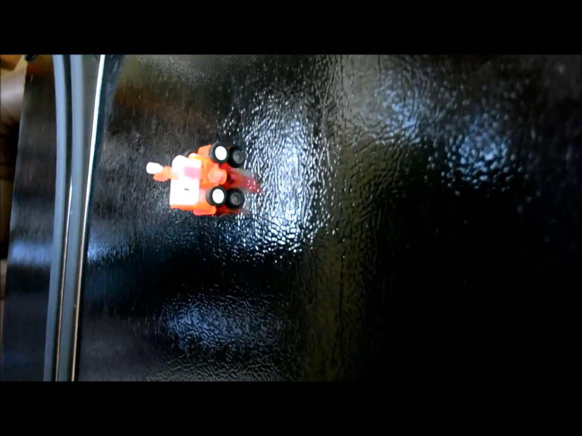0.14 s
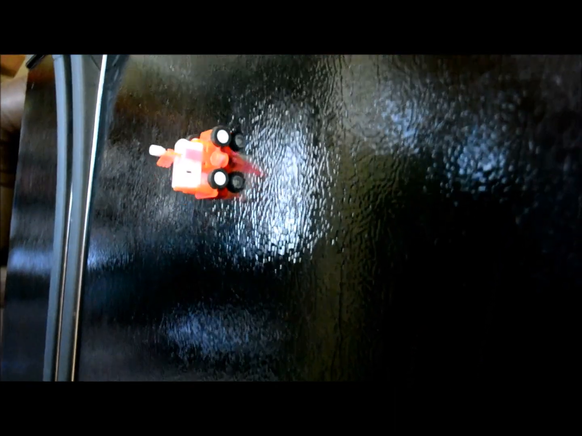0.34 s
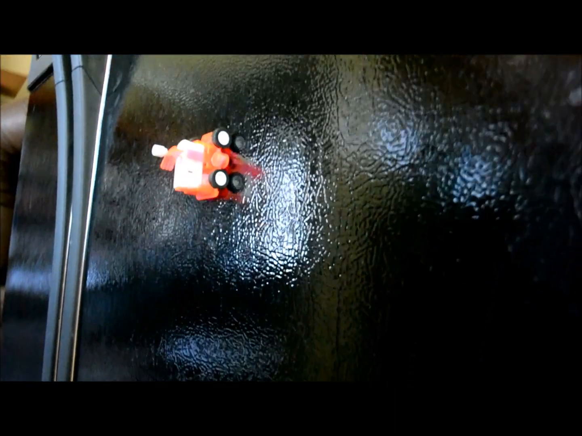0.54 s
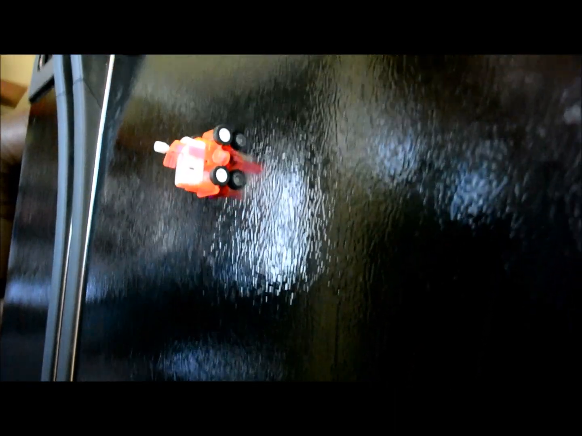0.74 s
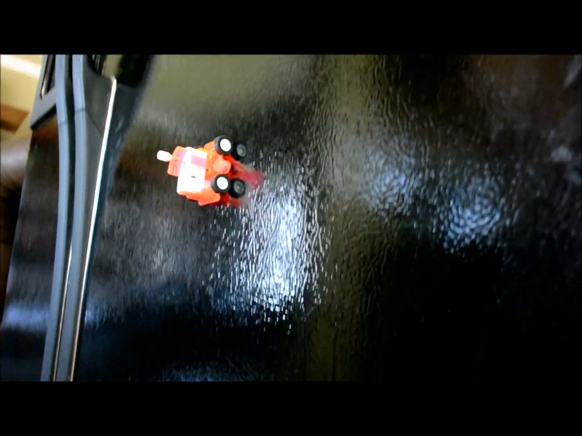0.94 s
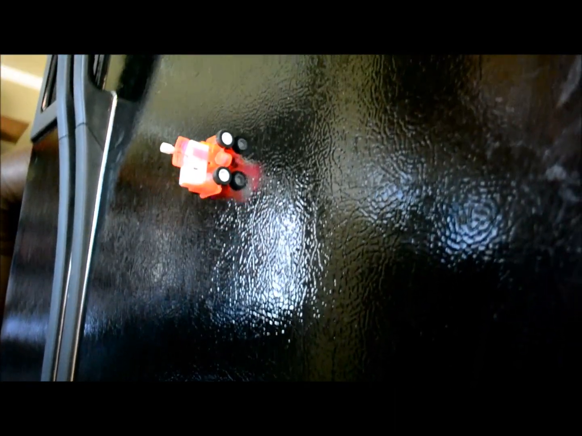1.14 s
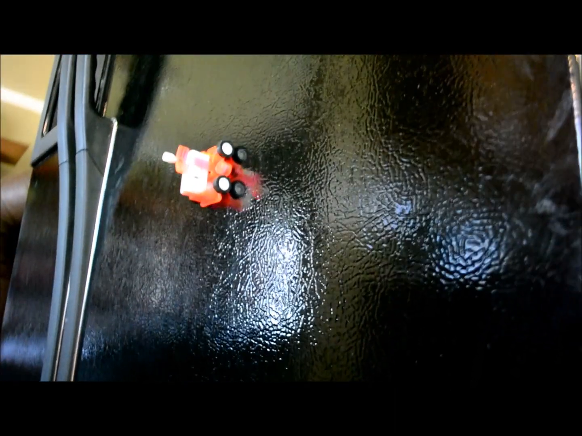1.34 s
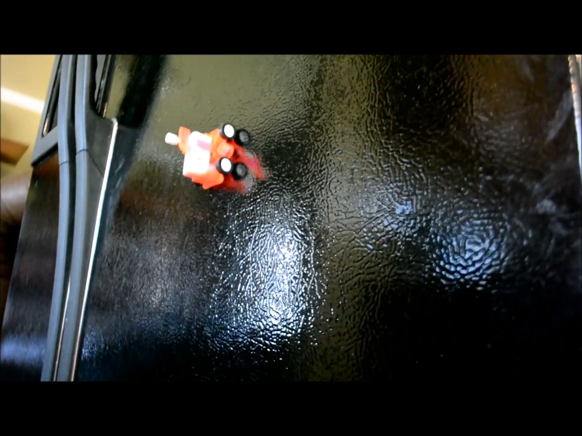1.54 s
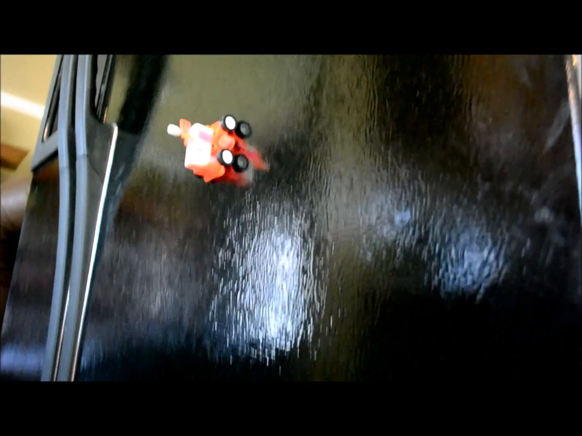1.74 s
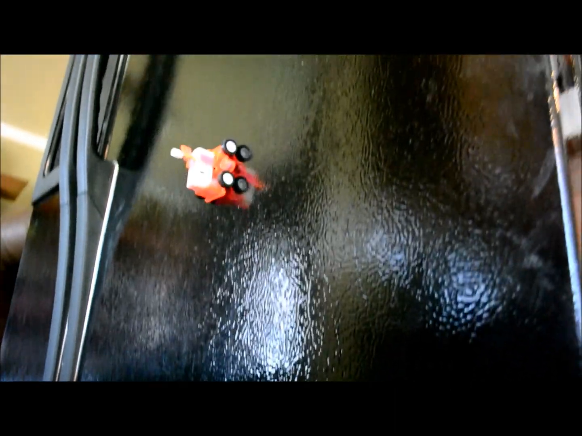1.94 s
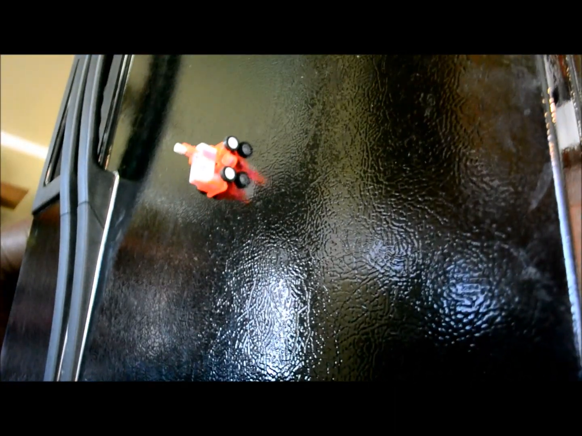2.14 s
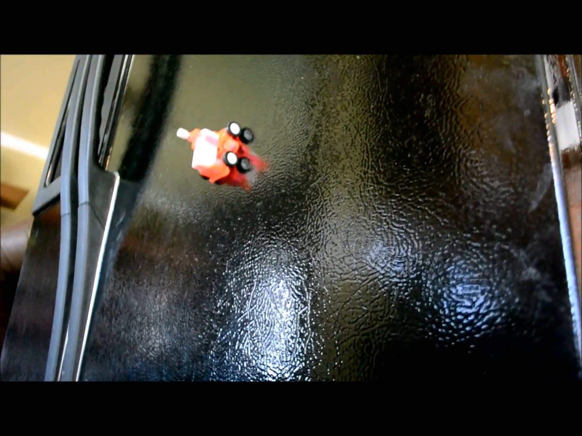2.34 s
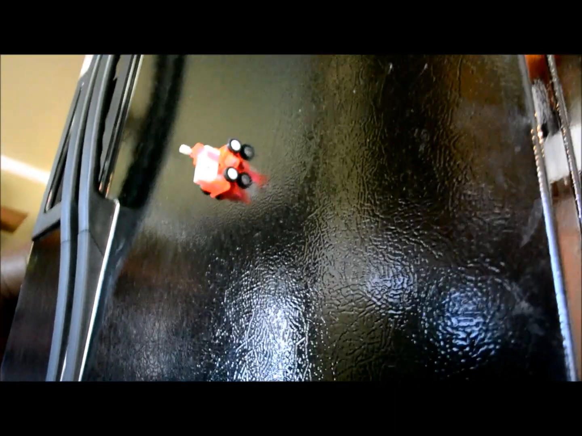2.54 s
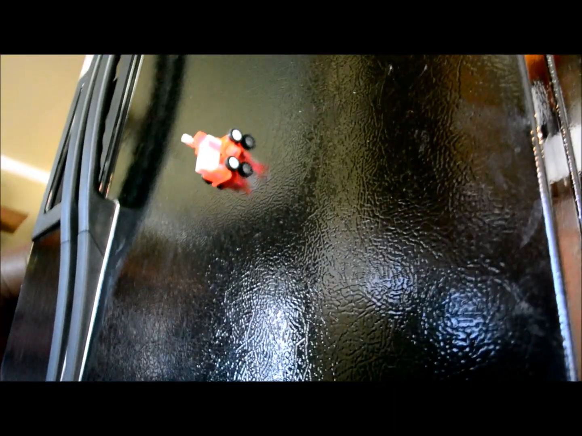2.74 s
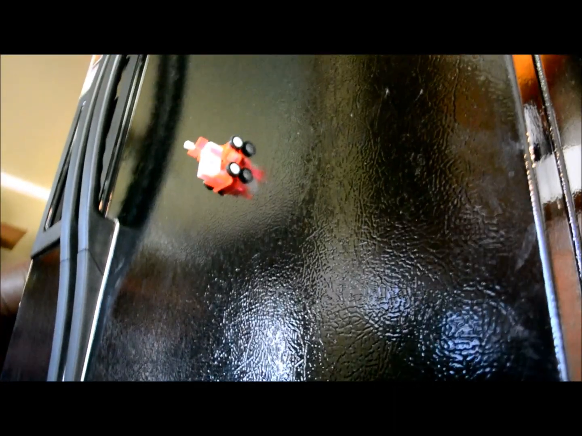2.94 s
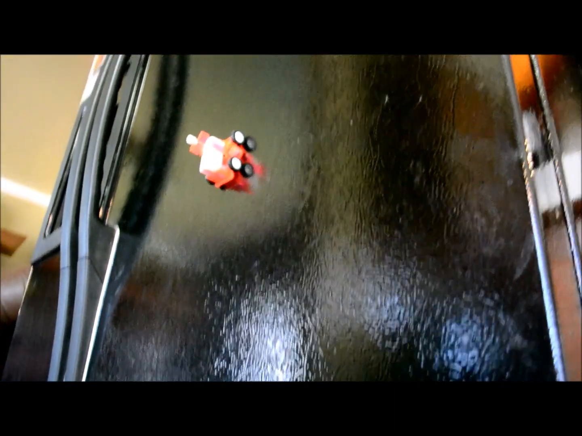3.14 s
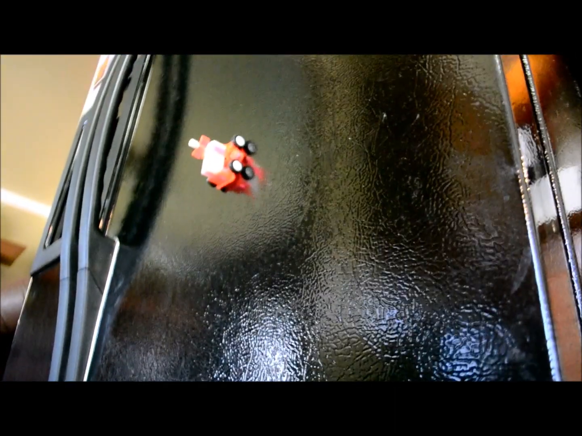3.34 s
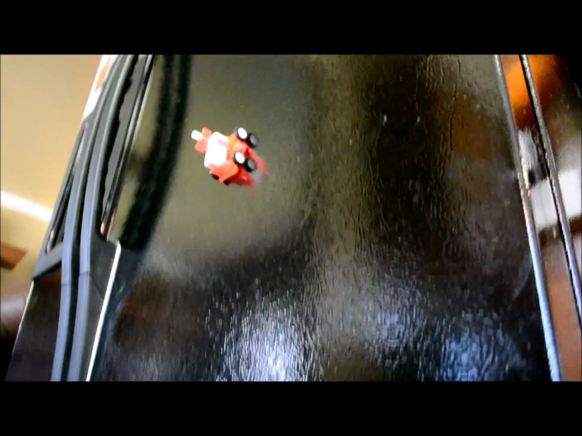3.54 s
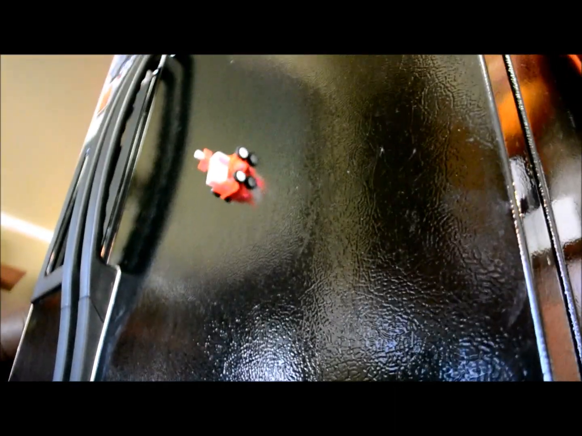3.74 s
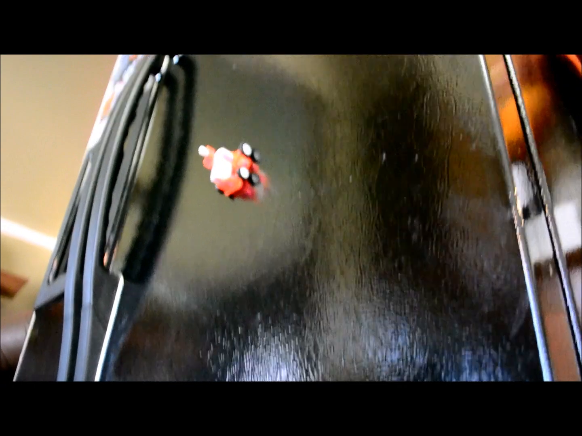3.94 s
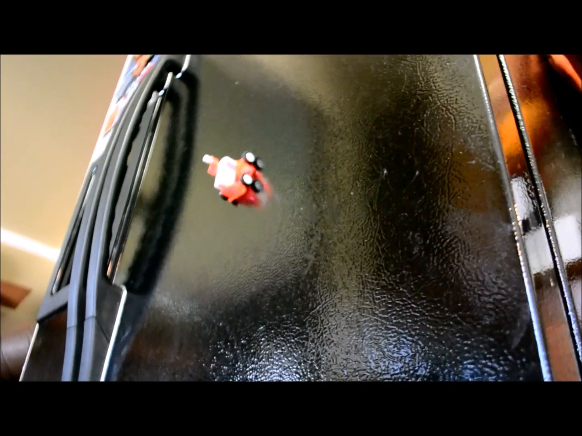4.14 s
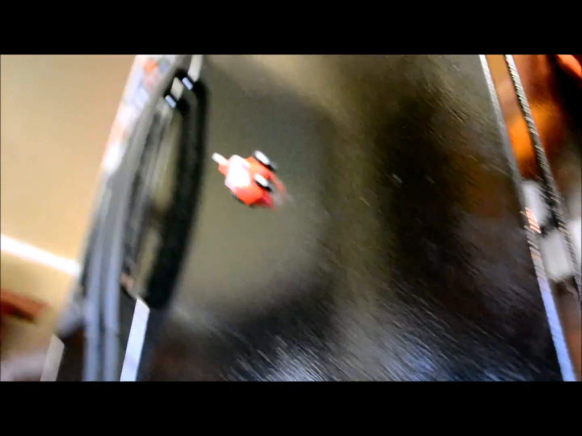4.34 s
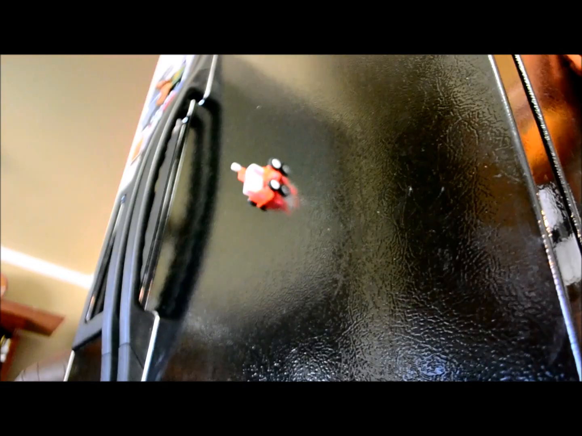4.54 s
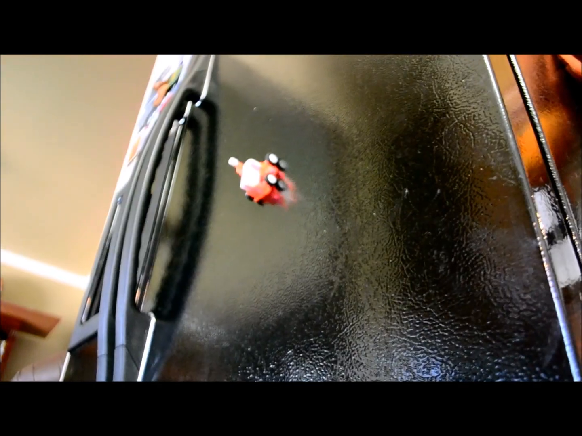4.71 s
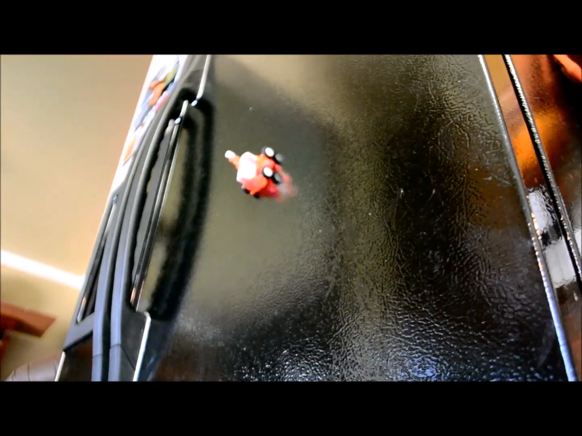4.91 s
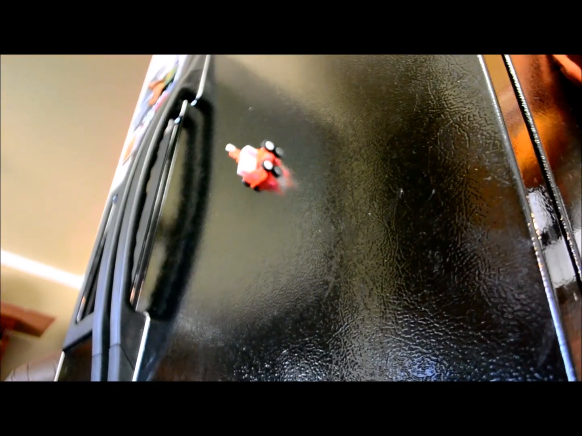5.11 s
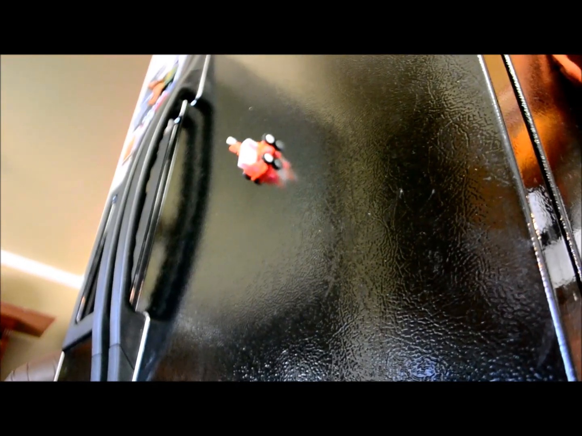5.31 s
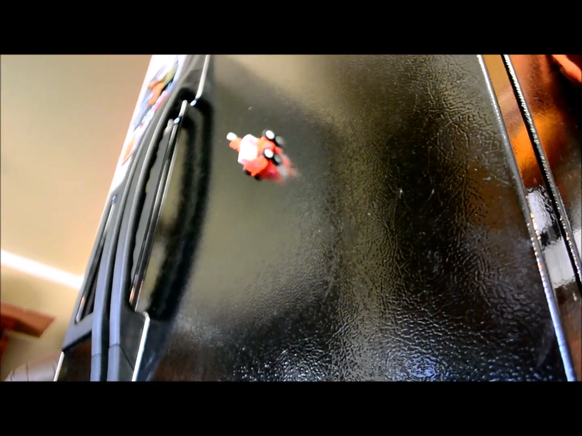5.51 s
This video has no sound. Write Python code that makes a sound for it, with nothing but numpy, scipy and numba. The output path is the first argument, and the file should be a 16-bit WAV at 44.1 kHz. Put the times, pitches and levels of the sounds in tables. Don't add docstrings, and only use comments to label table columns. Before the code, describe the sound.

A small clockwork motor buzzes with a bright plastic ticking whir on a steel fridge door, gradually slowing and stuttering over a faint hum.

```python
import sys
import numpy as np
from scipy import signal
from scipy.fft import rfft, irfft
from scipy.io import wavfile
from scipy.ndimage import uniform_filter1d
from numba import njit

SR = 44100
rng = np.random.default_rng(int(sys.argv[2]) if len(sys.argv) > 2 else 0)


def volts(x):
    e = np.asarray(x, float) / 20
    return 10 ** e


def transcribe(u):
    v = np.clip(np.atleast_2d(u).T, -1, 1)
    q = np.round(v * 32767).astype(np.int16)
    wavfile.write(sys.argv[1], SR, q)


N = 250047

# time_s, teeth_passed
TEETH = [(0.0034, 0), (0.0854, 9), (0.1249, 13), (0.2163, 23), (0.241, 26), (0.4067, 44), (0.4321, 47),
         (0.6169, 67), (0.6794, 73), (0.8599, 91), (0.9151, 97), (0.9756, 103), (1.0483, 111),
         (1.1098, 118), (1.3059, 138), (1.3853, 145), (1.598, 165), (1.6752, 173), (1.9735, 202),
         (2.044, 209), (2.1381, 217), (2.2051, 223), (2.2746, 230), (2.3716, 239), (2.397, 241),
         (2.5147, 251), (2.7077, 269), (2.7895, 276), (2.9227, 289), (3.0318, 299), (3.0693, 302),
         (3.1122, 305), (3.333, 323), (3.4532, 332), (3.4971, 335), (3.6012, 344), (3.6521, 349),
         (3.7798, 360), (3.8576, 366), (3.9032, 370), (4.0625, 382), (4.0826, 383), (4.1076, 385),
         (4.1936, 391), (4.3322, 401), (4.4177, 408), (4.4609, 411), (4.5482, 418), (4.5907, 421),
         (4.6929, 429), (4.7504, 434), (4.816, 439), (4.874, 443), (4.9365, 448), (5.0292, 454),
         (5.095, 459), (5.1917, 465), (5.2544, 470), (5.3685, 477)]
# time_s, teeth_passed
LAST_TEETH = [(5.4585, 484), (5.4749, 485), (5.4908, 486), (5.5257, 488), (5.5462, 489), (5.5577, 490),
              (5.5808, 491), (5.6672, 496)]
# time_s, level_db
TORQUE = [(0, -46), (.4, -46.5), (.85, -46), (1.1, -44.5), (1.4, -45.5), (1.85, -44), (2.9, -44),
          (3.2, -46), (3.65, -45), (4.0, -48), (4.4, -46), (4.9, -47), (5.4, -46), (5.67, -49)]
# deepest_s, depth_db, half_length_s
STALLS = [(0.56, -1.5, 0.045), (2.104, -3, 0.047), (2.768, -1.5, 0.036), (2.986, -3, 0.019),
          (3.19, -1.5, 0.026), (3.367, -1, 0.025), (3.478, -3, 0.041), (4.135, -6, 0.091),
          (4.102, -8, 0.011), (4.274, -7.5, 0.035), (4.354, -8, 0.015), (4.586, -4, 0.038),
          (4.706, -6.5, 0.022), (4.84, 0.5, 0.036), (5.13, -8.5, 0.1), (5.317, -4.5, 0.072),
          (5.458, -5, 0.022), (5.48, -13.5, 0.076), (5.565, -5, 0.05)]
# place_in_cycle (0-1), lower_db, middle_db, upper_db, top_db
BEATS = [
    (0, 0, 0, 0, 0),
    (.3, -6, -5, -12, -12),
    (.46, -16, -9, -4, -4),
    (.66, -16, -5, -12, -12),
]
# time_s, peak_db
BLOWS = [(0.3982, -28), (0.4308, -26), (0.6071, -25), (0.77, -22), (0.8275, -21.5), (0.934, -23),
         (1.039, -23.5), (1.1485, -25), (1.1587, -26), (1.188, -30), (1.2368, -25), (1.2948, -22.5),
         (1.3516, -23), (1.405, -23), (1.4496, -23.5), (1.4711, -23), (1.522, -19), (1.6076, -21),
         (1.617, -24), (1.6953, -18), (1.7884, -21.5), (1.7986, -16.5), (1.8094, -20), (2.0336, -21),
         (2.068, -23), (2.1384, -23), (2.17, -28), (2.1937, -28), (2.2633, -21), (2.2954, -23.5),
         (2.3497, -21), (2.3605, -20.5), (2.42, -22.5), (2.4324, -22), (2.525, -21.5), (2.547, -21.5),
         (2.6749, -20.5), (2.6854, -21), (2.696, -19), (2.7657, -21), (2.79, -26), (2.8004, -23.5),
         (2.81, -21.5), (2.8183, -20), (2.8502, -20.5), (2.9554, -21), (3, -24), (3.021, -23),
         (3.0686, -29), (3.098, -23), (3.138, -24), (3.1838, -21), (3.234, -21), (3.3267, -26),
         (3.332, -22.5), (3.3452, -25),
         (3.4262, -23), (3.467, -26), (3.5212, -24), (3.5313, -22), (3.5436, -26), (3.5548, -21),
              (3.5773, -24), (3.5885, -22), (3.6003, -20.5), (3.6323, -22), (3.6423, -19), (3.6528, -22),
              (3.664, -21), (3.7089, -20.5), (3.757, -20), (3.769, -24), (3.78, -23.5), (3.805, -23),
              (3.8302, -23.5), (3.8693, -38), (3.8806, -22), (3.893, -24.5), (3.984, -24), (3.997, -25),
              (4.0479, -21.5), (4.22, -23), (4.2905, -26), (4.3067, -24), (4.32, -23.5), (4.381, -29),
              (4.4046, -21.5), (4.535, -26), (4.6162, -24), (4.6546, -24), (4.6806, -26), (4.7387, -27.0),
              (4.7501, -23), (4.762, -28), (4.7766, -27), (4.8025, -26), (4.8165, -28), (4.874, -30),
              (4.887, -22), (4.8986, -25), (4.9103, -29), (4.9233, -27), (4.9368, -23), (4.952, -24),
              (5.0137, -25), (5.029, -29), (5.096, -28), (5.1532, -35), (5.16, -25), (5.2307, -23),
              (5.318, -25.5), (5.351, -27), (5.381, -27), (5.408, -24.5), (5.6335, -30.5), (5.6487, -28.5),
         (5.0422, -27), (5.0605, -38), (5.1752, -29), (5.1895, -30), (5.2028, -30), (5.242, -26),
              (5.2546, -33), (5.27, -28), (5.3024, -29), (5.3667, -31), (5.395, -32), (5.5808, -41),
              (5.6002, -29), (5.616, -35),
         (0.0218, -27), (0.0491, -22.5), (0.105, -37), (0.1426, -25), (0.1705, -24), (.2071, -21.5),
               (0.3057, -23), (0.3698, -27), (0.389, -26), (0.4138, -22), (3.259, -28), (3.2839, -29),
               (3.2954, -25), (3.3748, -26), (3.3867, -25), (3.4144, -27), (3.4962, -28), (3.5097, -25),
               (3.928, -30), (3.9505, -30), (3.9564, -29), (3.9694, -25), (4.0377, -30), (4.0625, -28),
               (4.0824, -28), (4.1076, -35), (4.1195, -30), (4.1265, -32), (4.135, -32), (4.1777, -30),
               (4.2078, -30), (4.2423, -36), (4.2736, -34), (4.3677, -32), (4.3934, -23), (4.433, -22),
               (4.4857, -29), (4.5974, -32), (4.604, -35), (5.4285, -36), (5.4749, -44), (5.4908, -40),
               (5.5028, -39), (5.5257, -35), (5.5462, -43), (5.5577, -42), (5.6082, -34), (5.6575, -35),
               (5.6665, -47)]
# pitch_hz, width_hz, level_db, group (0 lower, 1 middle, 2 upper, 3 top)
SHELL_MODES = [(2950, 500, -8, 0), (3980, 300, -12, 0), (4850, 800, -3, 0), (6250, 450, -3, 1),
               (6850, 500, -4, 1), (7150, 500, -9, 1), (7500, 400, -4, 1), (8350, 500, 0, 2),
               (9100, 900, -1, 2), (9900, 1000, 0, 3), (10900, 1100, 0, 3)]
# time_s, edge_hz, first_twin_db, second_twin_db, first_twin_hz
SLIDE = [(0, 3240, 2, -9, 4280), (.55, 3590, 1, -3.5, 4210), (1.2, 3570, -6.5, -1.5, 4270),
         (1.6, 3710, -1.5, -7.5, 4310), (2.2, 3820, 0.5, -2, 4260), (2.6, 3530, -1.5, 1.5, 4280),
         (3.1, 3420, 0.5, -0.5, 4240), (3.6, 3350, -10.5, -1, 4250), (3.95, 3260, -3, -4.5, 4220),
         (4.4, 3230, -10.5, -1, 4160), (5.67, 3580, 2, -5, 4230)]
# time_s, pitch_hz, level_db
FACE = [(0, 5440, 3.5), (.4, 5630, 6), (.8, 5460, 3), (1.15, 5620, 2), (1.5, 5650, -1), (2, 5720, 0.5),
        (2.6, 5800, -1.5), (3, 5860, 1.5), (3.4, 5570, -5), (3.8, 5800, -1), (4.3, 5770, -2.5),
        (5, 5850, 1.5), (5.67, 5950, 4.5)]
# time_s, share_turned (0-1)
TURN = [(0, 0.4), (.35, 0.04), (1.05, 0.35), (1.5, 0.35), (1.7, 0.1), (2.1, 0.4), (2.5, 0.46), (3.2, 0.23),
        (3.7, 0.27), (4.4, 0.43), (5.0, 0.62), (5.67, 0.5)]
# pitch_hz, level_db
SHELL_RADIATION = [(1500, 12.5), (2400, -2), (3200, -3), (3700, 1), (10000, -2), (11000, -12)]
# pitch_hz, width_hz, level_db
DOOR = [(300, 19, -11.5), (1029, 124, 3), (1113, 92, 1.5), (1324, 140, 1.5), (1594, 120, 2.5),
        (1736, 290, 0.5)]
# start_s, peak_db, pitch_hz, fade_s (to -60 dB)
KNOCKS = [
    (.919, -36, 1230, .021),
    (1.275, -39.5, 1170, .026),
    (1.575, -48, 1290, .06),
    (3.52, -46, 1490, .02),
    (4.077, -44, 404, .012),
    (4.078, -42, 1700, .006),
    (4.363, -43, 600, .01),
    (4.366, -45, 250, .015),
    (5.604, -45, 1350, .014),
    (5.605, -44, 1850, .012),
]
# start_s, peak_db, pitch_hz, fade_s (to -60 dB)
BUMPS = [(1.2, -91, 45, .12), (1.62, -71, 80, .12), (1.925, -55, 116, 0.18), (2.207, -52, 87, 0.15),
         (2.228, -47.5, 126, 0.056), (2.25, -53, 215, 0.075), (2.54, -78, 50, 0.08),
         (3.195, -53, 70.4, .14), (3.3, -69, 59.4, .2), (3.58, -65, 75, .1), (4.35, -57, 104, 0.11)]
# multiple_of_mains, level_db
HUM = [(1, -82.5), (2, -71.3), (13, -74.9), (14, -71.3), (18, -74.1), (19, -72.3), (20, -70.3), (22, -73.3),
       (26, -75.7), (31, -76.3), (34, -77.5), (38, -77), (40, -76.4), (41, -77.4)]
# pitch_hz, level_db
FAN = [(192.0, -70.2), (268.0, -78.7), (390.2, -78.2)]
# pitch_hz, level_db (per Hz)
KITCHEN = [(30, -30), (55, -14), (100, -9), (160, -12), (300, 0), (450, -2), (620, -6), (1100, -4),
           (1800, -6), (2150, -14), (3000, -14), (4300, -11), (6500, -19), (8000, -26), (11000, -36)]
# pitch_hz, level_db
MICROPHONE = [(20, 0), (55, -1.5), (7650, 2), (7920, 3.5), (8200, 4.5), (10500, 7), (11000, -3),
              (11400, -8.5), (11700, -22.5), (12000, -60)]


def clockwork(lower_db=-0.97, upper_db=-2, top_db=0, top_fade=1.78, climb_db=-6):
    groups = ring_shell(*contacts())
    shell_db, bind_db = torque(), stalls()
    lower_stall, upper_stall = 0.35, 1.12
    lower_turn = -8 * curves(TURN)[0] + (lower_stall - 1) * bind_db
    upper_turn = np.linspace(-3, -10, N) + (upper_stall - 1) * bind_db + .6 * walk(18)
    top_turn = top_fade * upper_turn + climb_db * np.arange(N) / N
    group_db = [lower_db + lower_turn, 0, upper_db + upper_turn, top_db + top_turn]
    *body, top = [volts(shell_db + db) * unit(g) for db, g in zip(group_db, groups)]
    return colour(sum(body), SHELL_RADIATION) + top


def ring_shell(times, dbs, stagger_s=.0005):
    edge_hz, first_db, second_db, first_hz = curves(SLIDE)
    face_hz, face_db = curves(FACE)
    waver = 1 + .008 * walk(7)
    twin_hz, twin_width_hz = 4500, 165
    modes = [(edge_hz, 500, -8, 0),
             (first_hz * waver, twin_width_hz, first_db - 2.5, 0),
             (twin_hz / waver, twin_width_hz, second_db, 0),
             (face_hz, 500, face_db, 1)] + SHELL_MODES
    groups = np.zeros((4, N))
    count = len(times)
    push = np.sign(rng.standard_normal(count))
    firm = dbs[:, 0] > np.percentile(dbs[:, 0], 97.4)
    push[firm] = 1
    slip = rng.standard_normal(count) * np.interp(times * SR / N, (0, .6), (.000032, .000016))
    for k, (hz, width, db, group) in enumerate(modes):
        group, mean_hz = int(group), np.mean(hz)
        side = np.sign(rng.standard_normal(count))
        late = stagger_s * (rng.random(count) - .5) * (group > 0)
        if mean_hz < 4600:
            side = push * np.sign(mean_hz - 3900)
        else:
            side[firm] = (-1) ** k
            order_s = stagger_s * (k * .38 % 1 - .5) * .6
            late[firm] = order_s + slip[firm] * (1 + 3 * (mean_hz > 8800))
        share_db = (1.0 if group else .4) * rng.standard_normal(count)
        size = side * volts(dbs[:, group] + share_db) / np.sqrt(width)
        groups[group] += volts(db) * band(clicks(times + late, size), hz, width)
    return groups


def contacts(jitter_s=.00012, lead_s=.0002, hard_db=1.03, rebound_s=.0027):
    s, teeth = np.transpose(TEETH + LAST_TEETH)
    tooth = np.arange(teeth[-1] + 1)
    count = len(tooth)
    late = .057 * np.cos(2 * np.pi * (tooth + .38) / 10.25)
    times, dbs = [], []
    for (place, *group_db), slowing_db in zip(BEATS, (-1.5, -13.5, 2.5, -8.5)):
        jitter = jitter_s * (1 + 3 * place) * rng.standard_normal(count)
        times.append(np.interp(tooth + place + late, teeth, s) - lead_s + jitter)
        scatter_db = (1.5 if place else .5) * rng.standard_normal(count)
        dbs.append(np.add.outer(scatter_db + slowing_db * tooth / count, group_db))
    times, dbs = np.concatenate(times), np.concatenate(dbs)
    runs = unit(uniform_filter1d(rng.standard_normal((count, 1)), size=4, axis=0))
    dbs[:count] += hard_db * (0.76 + tooth[:, None] / count) * runs
    rebound = np.arange(len(times)) // count == 1
    hard_blows(times, dbs, rebound, lead_s)
    times[rebound] = times[:count] + rebound_s + jitter_s * rng.standard_normal(count)
    dbs[:, 0] -= 7 * (times * SR / N) ** 2
    times, dbs = chatter(times, dbs)
    loose, loose_db = loose_gears(s, teeth)
    return np.concatenate([times, loose]), np.concatenate([dbs, loose_db])


def hard_blows(times, dbs, rebound, lead_s, blow_db=19, body_follows=0.3):
    shell_db = torque()
    for at, db in BLOWS:
        k = np.argmin(abs(times - at) - .00015 * dbs[:, 1] + rebound)
        usual_db = dbs[k, 0]
        times[k] = at - lead_s
        dbs[k] = db - shell_db[int(at * SR)] - blow_db + np.array([-0.43, -0.22, 0.066, -1.0])
        dbs[k, 0] += (1 - body_follows) * (usual_db - dbs[k, 0])


def chatter(times, dbs, chatter_s=.0006):
    slow = times * SR / N
    slow_db = slow[:, None]
    lag = chatter_s * (.4 + rng.random((len(times), 3)))
    impact_times = [times - lag[:, 0],
                    times,
                    times + lag[:, 1] * (1 + slow),
                    times + lag[:, 2] * (2 + 2 * slow)]
    impact_dbs = [dbs - [13, 8, 5, 5] - 7 * slow_db,
                  dbs,
                  dbs - [18, 10, 8, 8] + slow_db * [4, 4, 7, 7],
                  dbs - [22, 15, 13, 13] + slow_db * [4, 7, 11, 11]]
    return np.concatenate(impact_times), np.concatenate(impact_dbs)


def loose_gears(s, teeth, rattle_db=-19, tail_db=2, settle_db=-5):
    spot = teeth[-1] * rng.random(16000)
    dbs = rattle_db + tail_db * rng.exponential(size=(len(spot), 1)) + np.array([-2.5, 2, -4.5, -3.0])
    return np.interp(spot, teeth, s), dbs + settle_db * (spot[:, None] % 1) ** 2


def torque():
    swell = np.cos(2 * np.pi * (passed() - 2) / 11)
    return curves(TORQUE)[0] + 0.5 * swell + stalls()


def stalls():
    t = np.arange(N) / SR
    return sum(db * np.clip(1 - ((t - s) / half) ** 2, 0, 1) for s, db, half in STALLS)


def passed():
    return curves(TEETH + LAST_TEETH)[0]


def wheels(grit_db=2, boom_db=-62, boom_fade_db=-14, rumble_stall=0.95):
    grit = rng.standard_normal(N) * volts(grit_db * walk(150) + .6 * walk(9))
    tilt_db = np.interp(np.arange(N) / SR, (0, 2.5), (19.5, -1))
    panel = np.zeros(N)
    for k, (hz, width, db) in enumerate(DOOR):
        gain = volts(db + tilt_db * np.log2(hz / 1330)) / np.sqrt(width)
        panel += (-1) ** k * gain * band(grit, hz, width)
    boom = unit(band(band(grit, 275, 210), 275, 210)) * volts(boom_db + boom_fade_db * np.arange(N) / N)
    angle = 2 * np.pi * (passed() + 7.5) / 59.4
    turn_db = 1.5 * np.cos(angle) + 1.5 * np.cos(2 * angle)
    rumble_db = np.linspace(-56, -59, N) + turn_db + rumble_stall * stalls()
    return unit(panel) * volts(rumble_db) + boom


def knocks():
    return hits(KNOCKS, 0.0006)


def bumps():
    return hits(BUMPS, 0.023)


def hits(table, rise_s):
    out, t = np.zeros(N), np.arange(SR // 4) / SR
    for s, db, hz, t60 in table:
        ring = np.sin(2 * np.pi * hz * t) * (1 - np.exp(-t / rise_s)) * volts(-60 * t / t60)
        at = int(s * SR)
        out[at:at + len(t)] += (volts(db) * ring / ring.max())[:N - at]
    return out


def room(x, count=12, t60_s=.18):
    t, out = np.arange(SR // 4) / SR, np.zeros(N)
    place = np.arange(N) / N * (count - 1)
    for k in range(count):
        tail = rng.standard_normal(len(t)) * volts(-60 * t / t60_s) * (t > .003)
        share = np.sqrt(np.clip(1 - abs(place - k), 0, 1))
        out += signal.oaconvolve(x * share, tail / np.sqrt(np.sum(tail ** 2)))[:N]
    return out


def fridge(hum_db=3, mains_hz=59.995, buzz_db=-95, buzz_fall_db=-22, kitchen_db=-58):
    t = np.arange(N) / SR
    orders = np.arange(21, 47)
    partials = dict(zip(orders, buzz_db + np.linspace(0, buzz_fall_db, len(orders))))
    partials = partials | dict(HUM)
    lines = [(mains_hz * k, db) for k, db in partials.items()] + FAN
    hum = sum(volts(db) * np.sin(2 * np.pi * (hz * t + rng.random())) for hz, db in lines)
    noise = unit(colour(rng.standard_normal(N), KITCHEN)) * volts(kitchen_db)
    return volts(hum_db + .5 * walk(25)) * hum + noise


def unit(x):
    return x / np.sqrt(np.mean(x ** 2))


@njit
def svf(x, g, k):
    y, b, l = np.empty(len(x)), 0., 0.
    for i in range(len(x)):
        v = (b + g[i] * (x[i] - l)) / (1 + g[i] * (g[i] + k[i]))
        b, l, y[i] = 2 * v - b, l + 2 * g[i] * v, k[i] * v
    return y


def band(x, hz, width):
    return svf(x + 1e-18, np.tan(np.pi * hz / SR) * np.ones(N), width / hz * np.ones(N))


def curves(table):
    s, *columns = np.transpose(table)
    return [np.interp(np.arange(N) / SR, s, c) for c in columns]


def walk(rate):
    k = int(SR / rate)
    return unit(uniform_filter1d(np.repeat(rng.standard_normal(N // k + 1), k), k)[:N])


def clicks(s, size):
    at = np.clip((s * SR).astype(int), 0, N - 1)
    return np.bincount(at, size, N)


def colour(x, table):
    hz, db = np.transpose(table)
    f = np.arange(N // 2 + 1) * SR / N + 1
    return irfft(rfft(x) * volts(np.interp(np.log(f), np.log(hz), db)), N)


def scene():
    toy = clockwork() + knocks()
    return (toy + volts(-12) * room(toy) + wheels() + bumps() + fridge())[None]


def low_pass(x):
    return signal.sosfilt(signal.butter(12, 11960, fs=SR, output="sos"), x)


def record(dry):
    mix = colour(dry[0], MICROPHONE)[None]
    return low_pass(mix)


dry = scene()
out = record(dry)
transcribe(out)
```